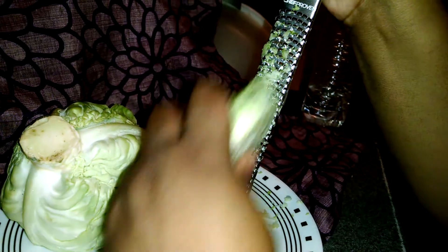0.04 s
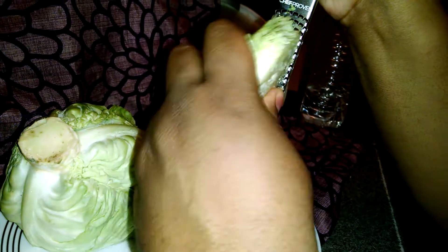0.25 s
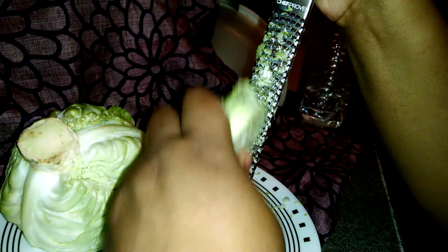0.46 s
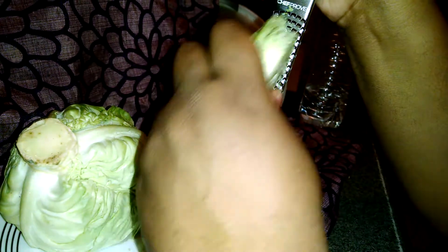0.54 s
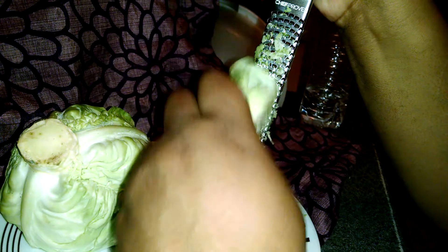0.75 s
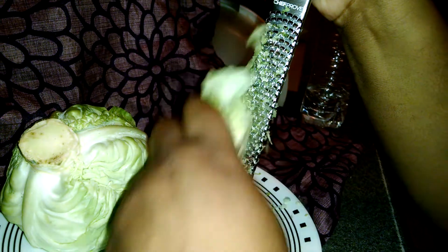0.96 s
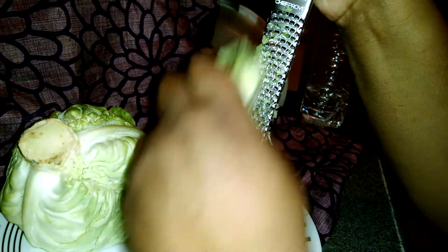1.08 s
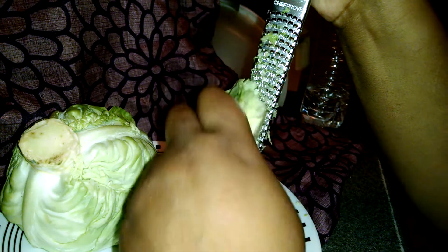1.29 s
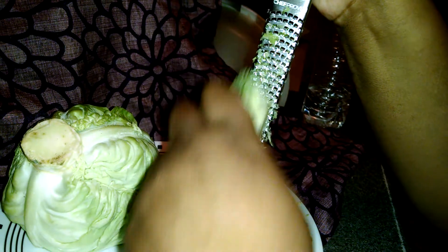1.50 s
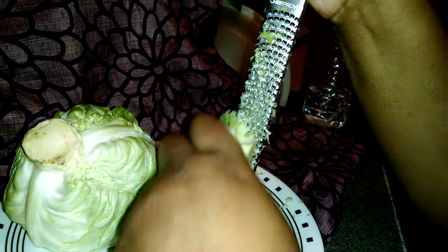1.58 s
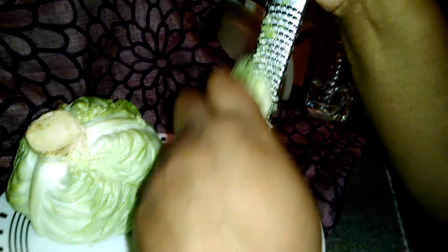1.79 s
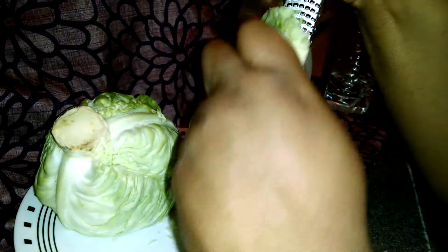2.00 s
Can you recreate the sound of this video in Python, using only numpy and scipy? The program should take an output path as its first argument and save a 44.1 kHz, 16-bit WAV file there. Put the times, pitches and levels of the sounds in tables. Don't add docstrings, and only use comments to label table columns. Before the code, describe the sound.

Fast rhythmic grating of crisp cabbage, harsh tearing down strokes and light scrapes back up, close by

```python
import sys
import numpy as np
from scipy import signal
from scipy.fft import rfft, irfft, next_fast_len
from scipy.io import wavfile
from scipy.ndimage import uniform_filter1d, map_coordinates

SR = 44100
rng = np.random.default_rng(int(sys.argv[2]) if len(sys.argv) > 2 else 0)


def boost(x):
    u = np.asarray(x, float) / 20
    return 10 ** u


def put_to_file(sound):
    columns = np.atleast_2d(sound).T
    safe = np.clip(columns, -1, 1)
    whole_steps = np.round(safe * 32767)
    wavfile.write(sys.argv[1], SR, whole_steps.astype(np.int16))


N = 90052
T = np.arange(N) / SR
M = next_fast_len(N + 4096)
F = np.fft.rfftfreq(M, 1 / SR)


def unit(x):
    return x / np.sqrt(np.mean(x ** 2))


def curve(table):
    hz, value = np.array(table).T
    return np.interp(np.log(F + 1), np.log(hz + 1), value)


def shape(x, gain):
    return irfft(rfft(x, M) * gain, M)[..., :N]


def ring(hz, width_hz):
    return 1 / (1 + 1j * (F ** 2 - hz ** 2) / ((F + 1) * width_hz))


def walk(rate_hz):
    hold = int(SR / rate_hz)
    held = rng.standard_normal(N // 50)[np.arange(N) // hold]
    return unit(uniform_filter1d(uniform_filter1d(held, hold), hold))


def hump(at_s, length_s):
    return np.exp(-(2 * (T - at_s) / length_s) ** 2)


# hz, left_minus_right_db
PORT_LEVEL = [(110, 3), (250, -1), (700, -1.5), (1300, 0), (2700, 0), (3900, -.3), (5000, -4), (8100, -8.5),
              (15000, -14)]
# hz, left_lead_rad
PORT_PHASE = [(0, 0), (1450, -.03), (2400, -3.05), (2950, -3.25), (3500, -6.2), (4150, -6.35),
              (6460, -12.8), (9300, -19.1), (15300, -31.6)]
# hz, level_db
LEFT_ONLY = [(300, -4), (800, -6), (1300, -23), (1900, -2), (2650, -10), (3250, -2), (3850, -10),
             (4700, -3.5)]


def ports(one, other):
    hz, lead_rad = np.array(PORT_PHASE).T
    phase = np.exp(1j * np.interp(F, hz, lead_rad))
    own = boost(curve(LEFT_ONLY + [(9000, -0.55)]))
    tilt = boost(curve(PORT_LEVEL))
    other = other * boost(3.5 * np.tanh(walk(14)))
    shared = shape(one, tilt * np.sqrt(1 - own ** 2) * phase)
    left = shared + shape(other, tilt * own)
    return np.array([left, one])


def drift(pair):
    lag_spread_s = 9e-6
    place = np.arange(N) + lag_spread_s * SR * walk(9)
    left = map_coordinates(pair[0], [place], mode="mirror")
    return np.array([left, pair[1]])


def room(pair):
    level_db, t60_s = -13, 0.22
    tail = rng.standard_normal(N) * boost(-60 * T / t60_s) * (T > 0.003)
    gain = rfft(tail / np.sqrt(np.sum(tail ** 2)), M) / (1 + F / 9000)
    return pair + boost(level_db) * shape(pair, gain)


# hz, level_db
KITCHEN_COLOUR = [(30, -4.5), (60, -2), (110, 1), (350, 0.5), (1000, -3.5), (2500, -9), (5000, -13),
                  (15000, -19)]


def kitchen():
    level_db = -37.5
    highpass = 1 / (1 + (25 / (F + 1)) ** 4)
    a, b = shape(rng.standard_normal((2, N)), boost(curve(KITCHEN_COLOUR)) * highpass)
    return unit(ports(a, b)) * boost(level_db + walk(5.03))


def bump():
    at_s, length_s, knock_hz, knock_db, rumble_db = 2.02, 0.017, 120, -31, -56
    knock = unit(shape(rng.standard_normal(N), ring(knock_hz, 130)))
    knock = knock * hump(at_s, length_s) * boost(knock_db)
    rumble = unit(shape(rng.standard_normal(N), ring(38, 30) ** 2)) * boost(rumble_db)
    x = knock + rumble
    return np.array([-0.6 * x, x])


# start_s (centre), length_s, pitch_hz, glide_hz_per_s, level_db
SQUEAKS = [
    (1.147, .014, 918, 7000, -30),
    (1.242, .007, 1410, 1000, -32),
    (1.666, .018, 680, 1000, -29),
    (1.281, .005, 1500, 1000, -33),
]


def squeaks():
    out = 0
    wobble_rad = 0.67 * walk(300)
    for at_s, length_s, pitch_hz, glide, level_db in SQUEAKS:
        t = T - at_s
        phase = 2 * np.pi * t * (pitch_hz + glide * t / 2)
        out = out + boost(level_db + 4) * hump(at_s, length_s) * np.sin(phase + wobble_rad)
    return out


# start_s, level_db
TICKS = [
    (0.82, -14),
    (1.8, -5),
    (1.2, -11),
    (1.6, -14),
    (.529, -10),
]


def ticks():
    x = np.zeros(N)
    for at_s, level_db in TICKS:
        x[int(at_s * SR)] = boost(level_db)
    x = shape(x, boost(curve(TEAR_COLOUR)))
    return ports(x, x)


# start_s, length_s, rasp_db, shake_db, peak_place (0-1 of length)
DOWN_STROKES = [(0.104, .122, -23.5, -30, 0.39), (0.377, .124, -22, -30.5, .62),
                (0.675, .13, -23.5, -28, 0.51), (.964, .14, -23, -31.5, .64),
                (1.26, .122, -23.5, -31.5, 0.36), (1.536, .142, -21.5, -32, .8),
                (1.832, .133, -23, -31, 0.64)]
UP_STROKES = [(-.04, .14, -34, -39.5, 0.83), (.235, .13, -35, -42, 0.17), (0.533, .128, -33.5, -43, 0.41),
              (.83, .125, -33.5, -42, 0.37), (1.112, .145, -33.5, -42, .35), (1.405, 0.14, -36, -43, .3),
              (1.685, .14, -33, -44.5, 0.23), (1.976, 0.16, -35, -41, 0.62)]


def swell(start_s, length_s, peak, start_power, stop_power):
    u = np.interp(T, [start_s, start_s + length_s * peak, start_s + length_s], [0, 0.5, 1])
    return np.abs(np.sin(np.pi * u)) ** np.where(u < 0.5, start_power, stop_power)


# pitch_hz, width_hz, level_db, left_minus_right_db
FRAME_MODES = [(82.6, 24, -10, 9.5), (109, 25.2, -2, 3.5), (190, 35, -7.5, 3), (307, 46, -6, -2.5),
               (382.3, 87, -4.5, 0.5), (516, 16, -21.5, 10)]


def frame():
    lead_s, alike = 0.01, 0.78
    push = sum(boost(shake_db) * swell(start_s - lead_s, length_s, peak, 0.81, 0.8)
               for start_s, length_s, _, shake_db, peak in DOWN_STROKES + UP_STROKES)
    out = 0
    for pitch_hz, width_hz, level_db, pan_db in FRAME_MODES:
        a, b = rng.standard_normal((2, N)) * push * boost(1.13 * walk(24.67))
        left = alike * a + np.sqrt(1 - alike ** 2) * b
        pair = np.array([left, a]) * boost(np.array([[pan_db], [-pan_db]]) / 2)
        level = boost(level_db) * np.sqrt(SR / width_hz)
        out = out + shape(pair, ring(pitch_hz, width_hz) ** 2) * level
    return out * boost(-1)


# pitch_hz, t60_s, level_db
BLADE_MODES = [(1646, 0.017, -22), (3524, 0.089, -13), (3820, 0.032, -18.5), (4100, 0.028, -12.5),
               (4440, 0.025, -20), (6240, 0.08, -24), (6660, 0.024, -18.5)]


def rasp(push, colour, patch_db):
    snaps_per_s, spread_db, rows_per_s, row_depth = 22000, 2.35, 240, 0.16
    row_rate = rows_per_s * (1 + 0.33 * walk(12))
    rows = 1 + row_depth * np.sin(2 * np.pi * np.cumsum(row_rate) / SR)
    hits = rng.random((2, N)) < snaps_per_s / SR
    size = boost(-spread_db * np.log(1 - rng.random((2, N))))
    snaps = hits * size * np.sign(rng.standard_normal((2, N)))
    blade = 1 + sum(boost(level_db + 12) * ring(pitch_hz, np.log(1000) / np.pi / t60_s)
                    for pitch_hz, t60_s, level_db in BLADE_MODES)
    highpass = 1 / (1 + (250 / (F + 1)) ** 4)
    force = push * rows * boost(patch_db * walk(44.95))
    gain = boost(curve(colour)) * blade * highpass
    gain = gain / np.sqrt(np.mean(np.abs(gain) ** 2))
    return ports(*shape(unit(snaps) * force, gain))


def catch(at_s, length_s):
    rise_s = 0.0014
    u = np.clip(T - at_s, 0, 1)
    return (1 - np.exp(-u / rise_s)) * np.exp(-(u / length_s) ** 2)


# start_s, length_s, level_db
SNAGS = [(0.242, 0.011, -33), (.527, .005, -26), (.74, .006, -21), (0.817, 0.01, -39), (0.899, 0.01, -35),
         (1.045, 0.0089, -21.5), (1.136, 0.021, -28), (1.236, .012, -28), (1.272, .012, -26.5),
         (1.422, 0.023, -34), (1.718, 0.014, -30.5), (1.968, .008, -31), (.38, .015, -30),
         (.681, .015, -31), (0.569, 0.0059, -46), (.985, .025, -30), (1.166, .005, -32), (.368, .003, -36)]
# hz, level_db
SKID_COLOUR = [(300, -6.5), (1100, -3.5), (1800, -4), (2400, 0), (4200, 0), (6500, 0.5), (8200, -4),
               (15500, -4.5)]


def skid():
    up = sum(boost(rasp_db) * swell(start_s, length_s, peak, 0.5, 0.5)
             for start_s, length_s, rasp_db, _, peak in UP_STROKES)
    snag = sum(boost(level_db) * catch(start_s, length_s) for start_s, length_s, level_db in SNAGS)
    return rasp(up + snag, SKID_COLOUR, patch_db=0.45)


# hz, level_db
TEAR_COLOUR = [(300, -6), (1100, -6.5), (1800, -7), (2400, -5), (4200, -1), (6500, -0.5), (8200, -4.5),
               (15500, -7.5)]


def tear():
    down = sum(boost(rasp_db) * swell(start_s, length_s, peak, 1.0, 0.62)
               for start_s, length_s, rasp_db, _, peak in DOWN_STROKES)
    return rasp(down, TEAR_COLOUR, patch_db=2.02)


def scene():
    grating = boost(4) * room(tear() + skid())
    return drift(grating + kitchen() + ticks()) + frame() + squeaks() + bump()


def roll_off(x):
    return signal.sosfilt(signal.butter(12, 16850, fs=SR, output="sos"), x)


def record(dry):
    top_hz = 15600
    lowpass = signal.ellip(12, 0.2, 80, top_hz, fs=SR, output="sos")
    mix = signal.sosfilt(lowpass, dry)
    return roll_off(mix)


dry = scene()
out = record(dry)
put_to_file(out)
```